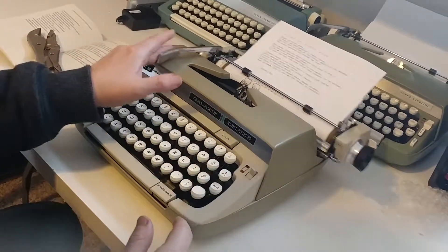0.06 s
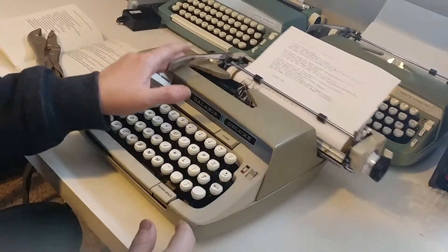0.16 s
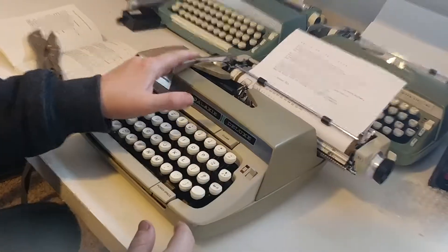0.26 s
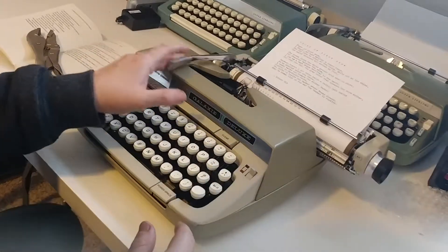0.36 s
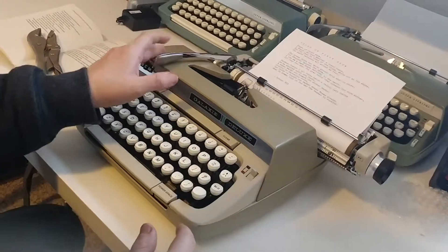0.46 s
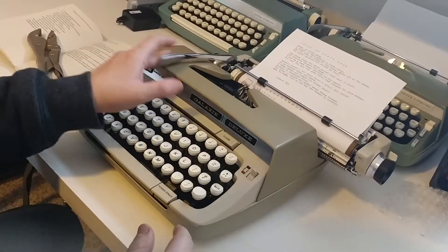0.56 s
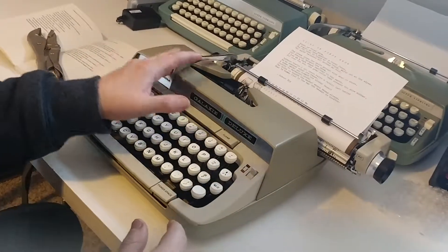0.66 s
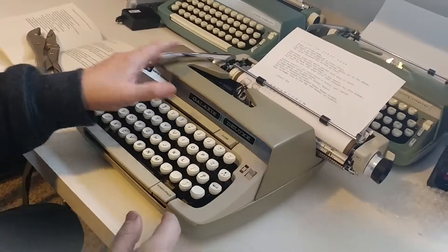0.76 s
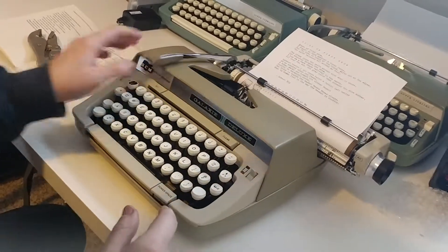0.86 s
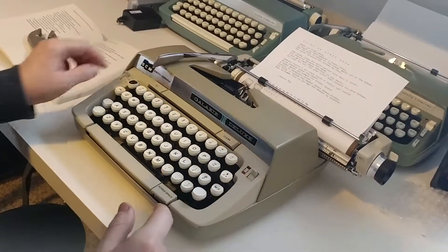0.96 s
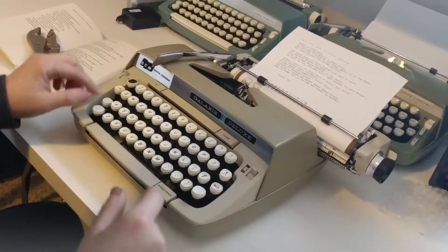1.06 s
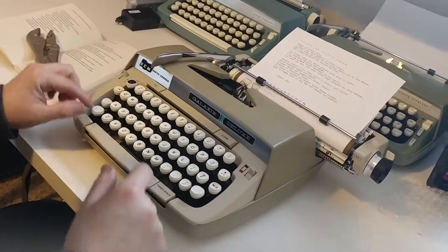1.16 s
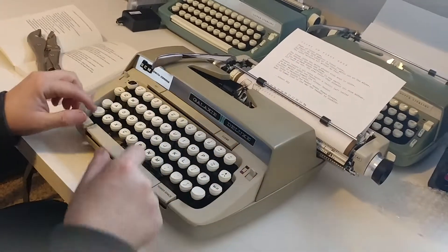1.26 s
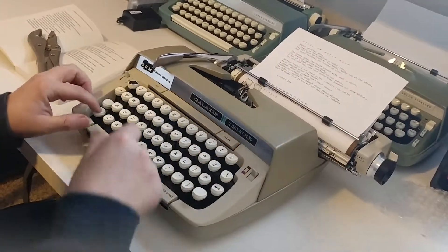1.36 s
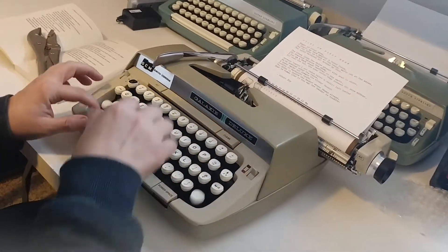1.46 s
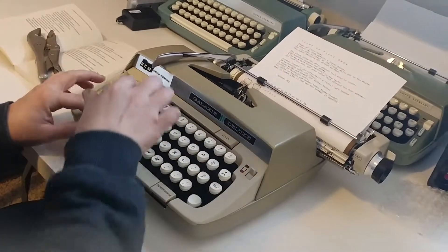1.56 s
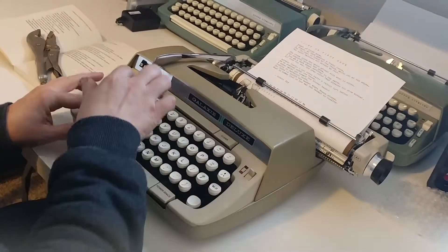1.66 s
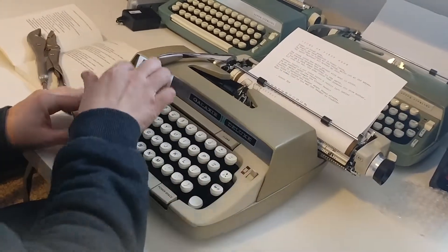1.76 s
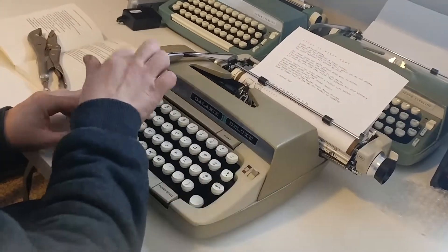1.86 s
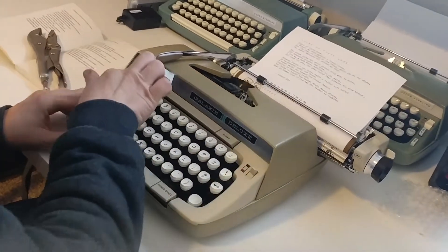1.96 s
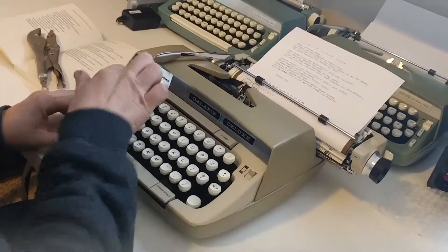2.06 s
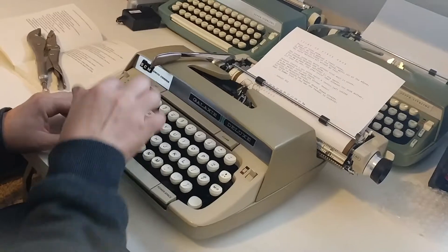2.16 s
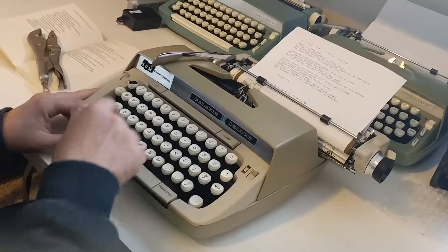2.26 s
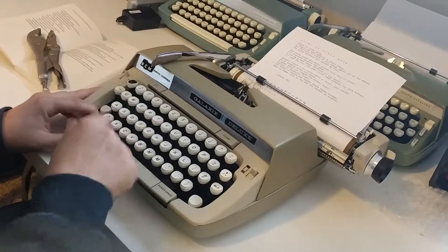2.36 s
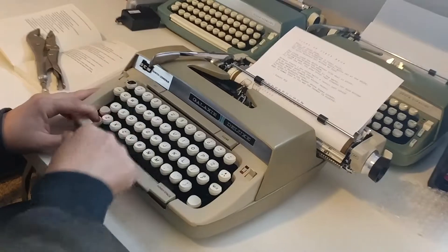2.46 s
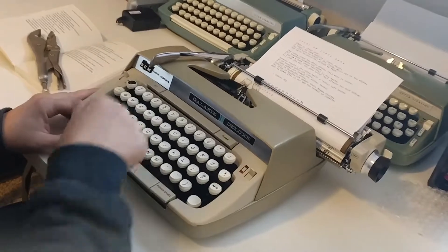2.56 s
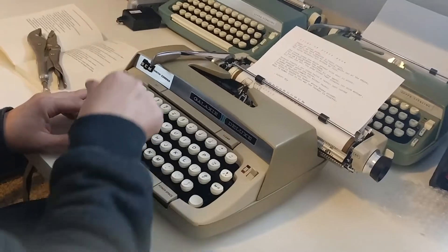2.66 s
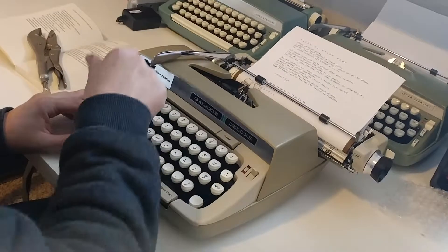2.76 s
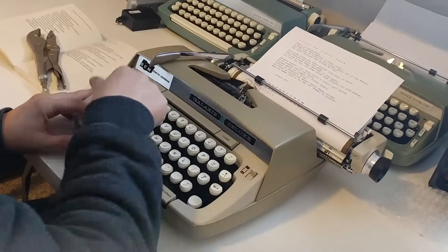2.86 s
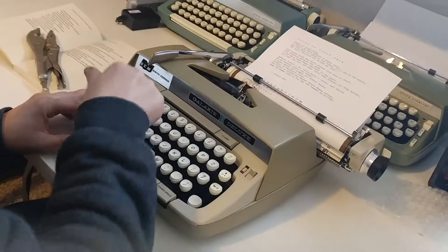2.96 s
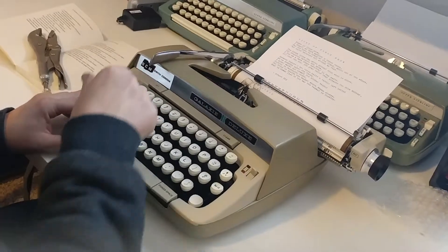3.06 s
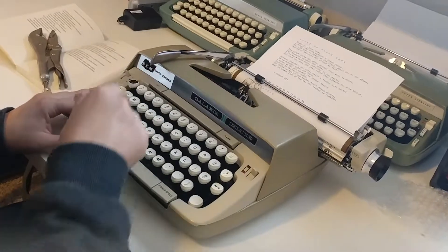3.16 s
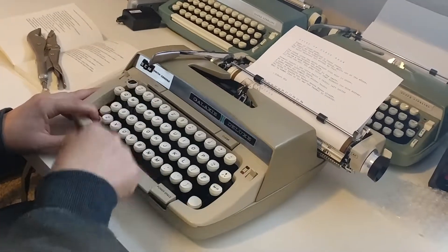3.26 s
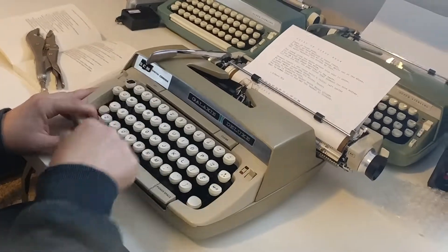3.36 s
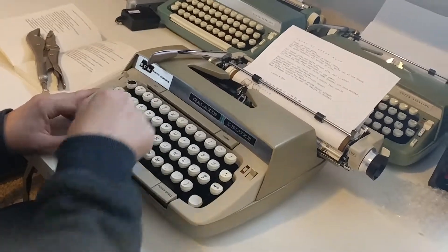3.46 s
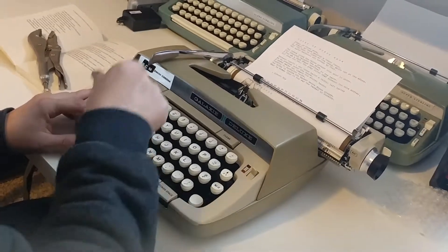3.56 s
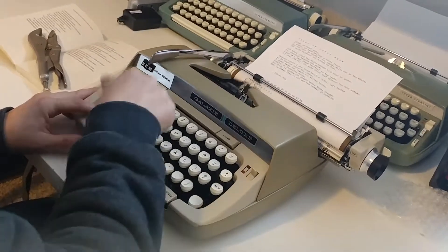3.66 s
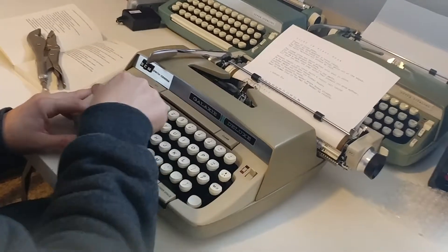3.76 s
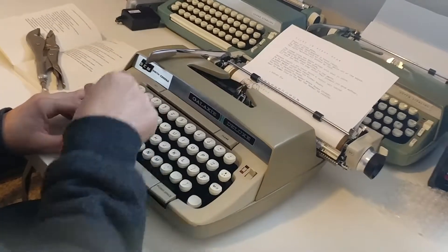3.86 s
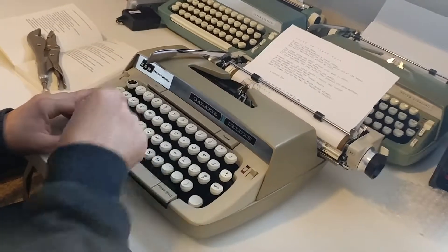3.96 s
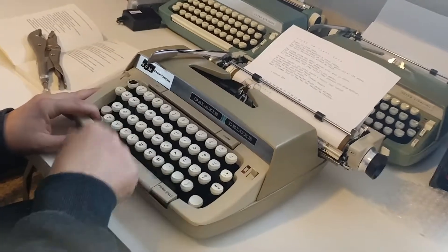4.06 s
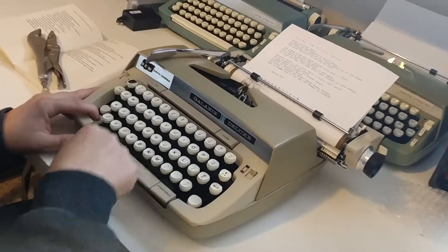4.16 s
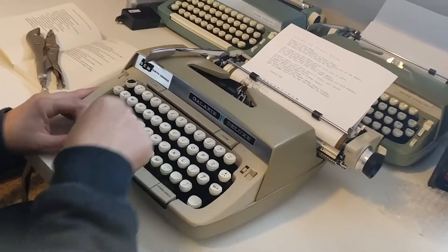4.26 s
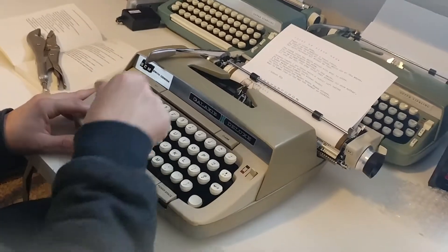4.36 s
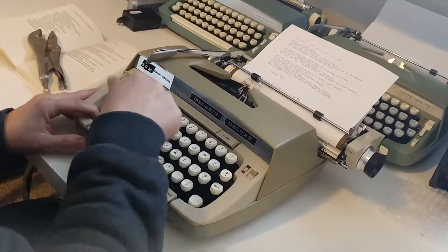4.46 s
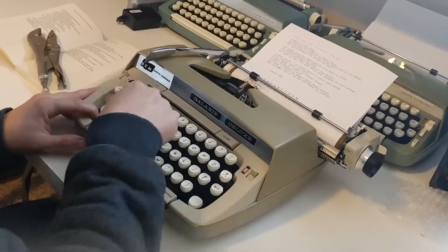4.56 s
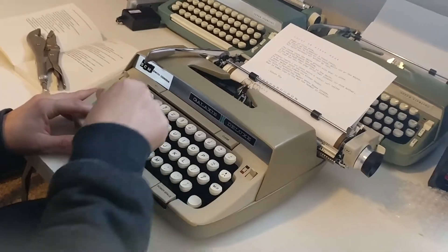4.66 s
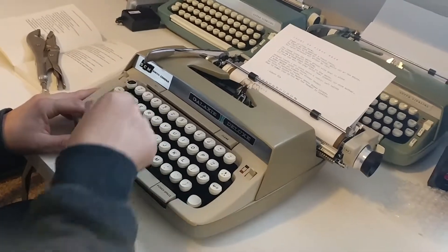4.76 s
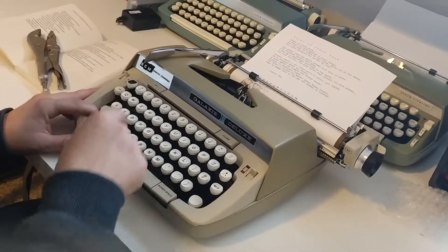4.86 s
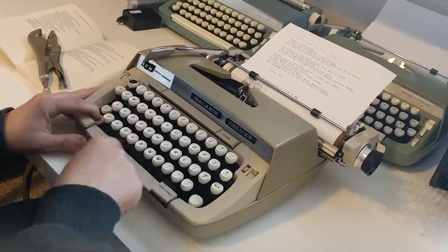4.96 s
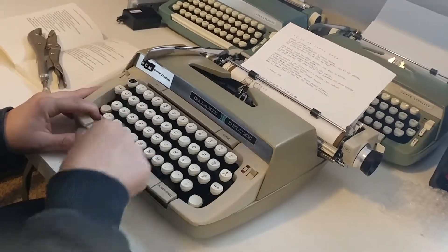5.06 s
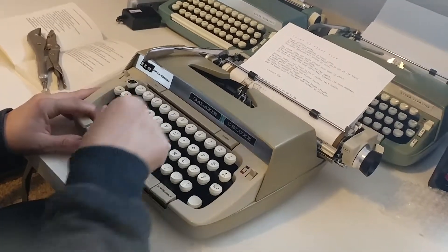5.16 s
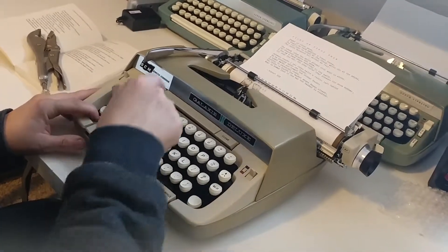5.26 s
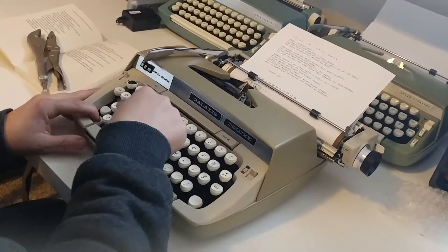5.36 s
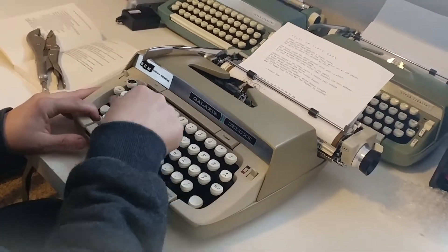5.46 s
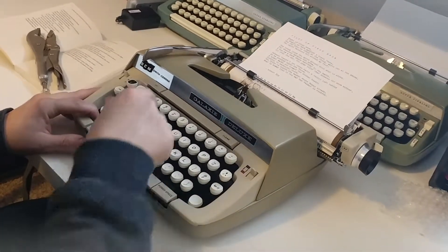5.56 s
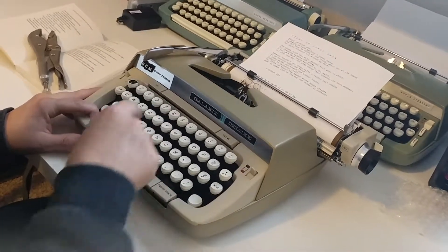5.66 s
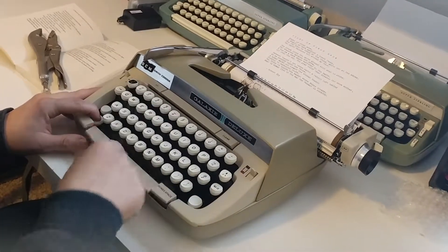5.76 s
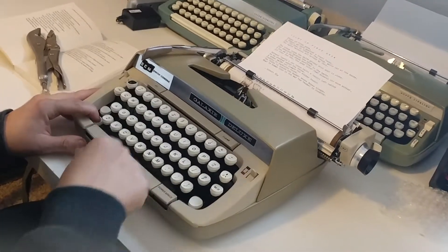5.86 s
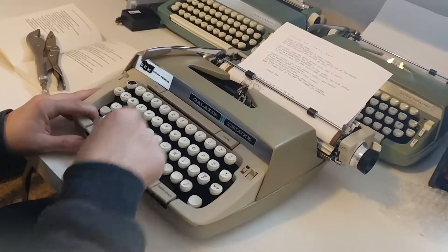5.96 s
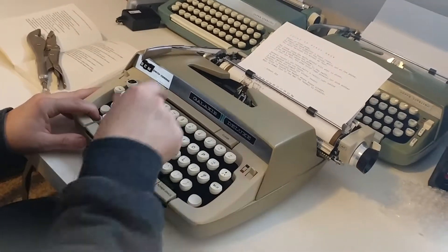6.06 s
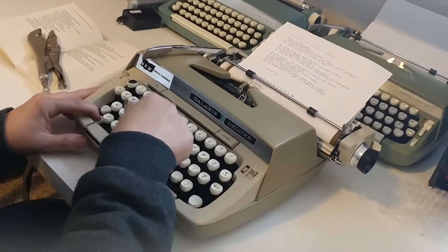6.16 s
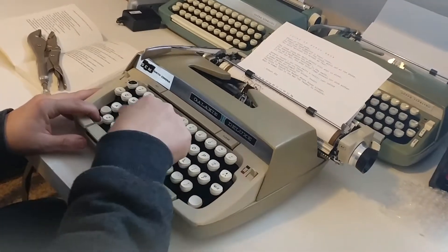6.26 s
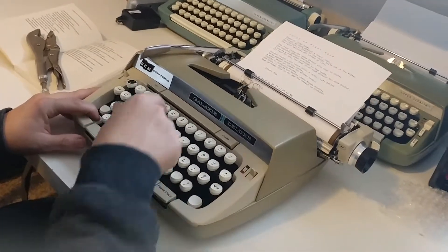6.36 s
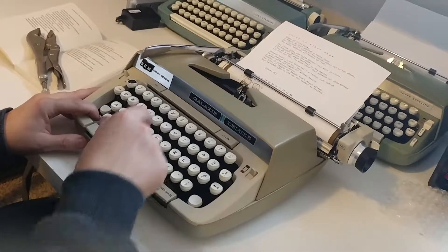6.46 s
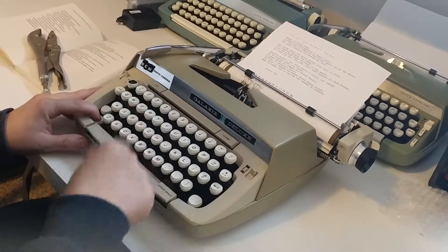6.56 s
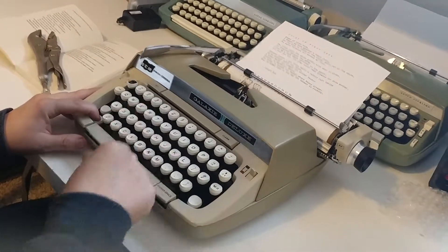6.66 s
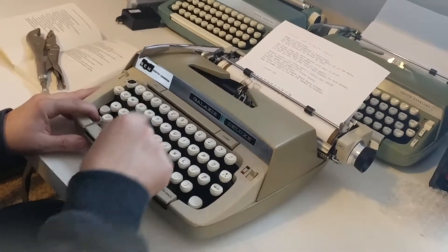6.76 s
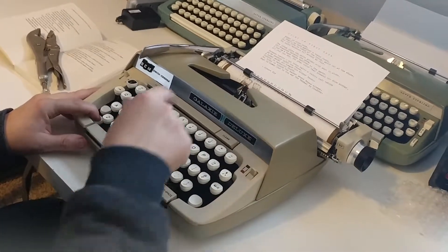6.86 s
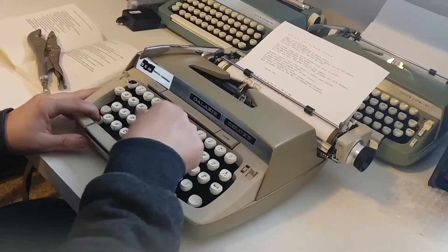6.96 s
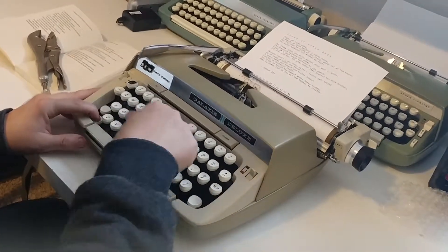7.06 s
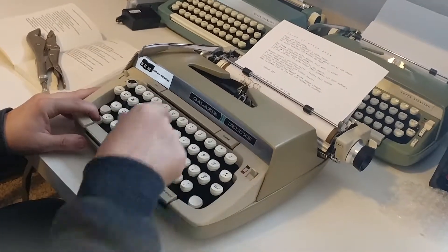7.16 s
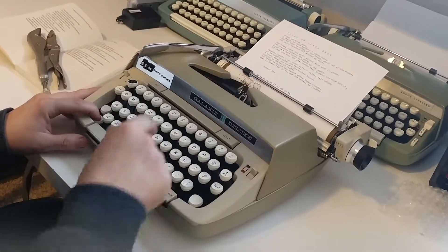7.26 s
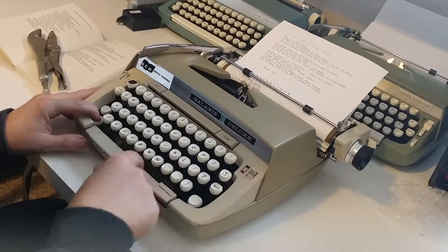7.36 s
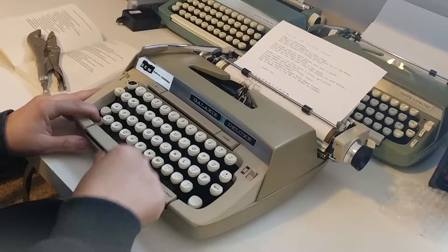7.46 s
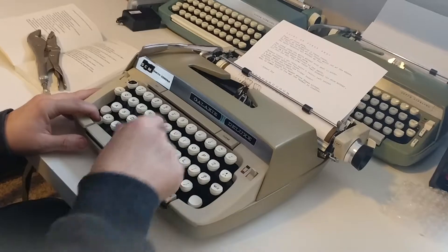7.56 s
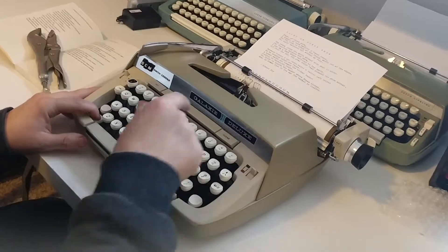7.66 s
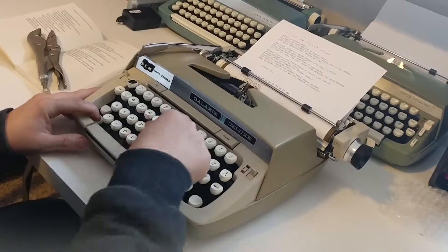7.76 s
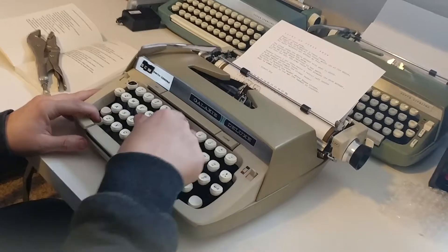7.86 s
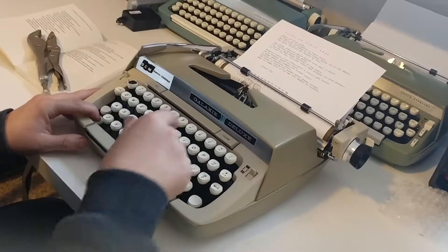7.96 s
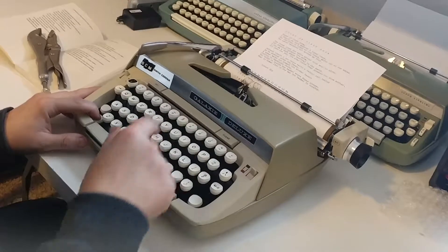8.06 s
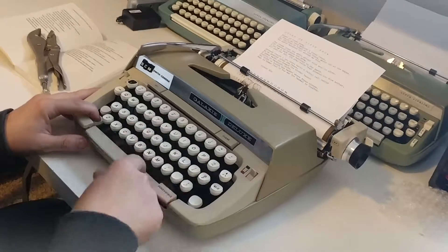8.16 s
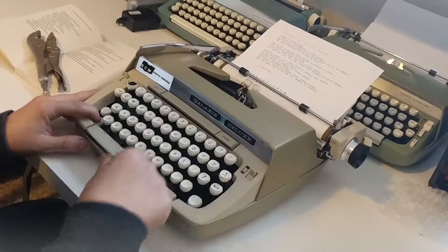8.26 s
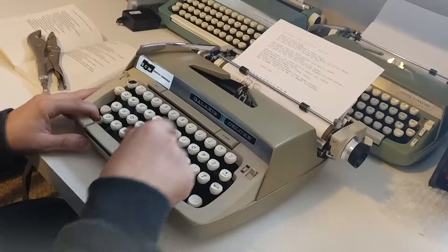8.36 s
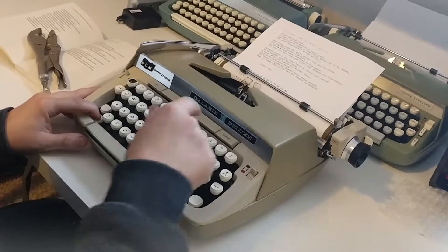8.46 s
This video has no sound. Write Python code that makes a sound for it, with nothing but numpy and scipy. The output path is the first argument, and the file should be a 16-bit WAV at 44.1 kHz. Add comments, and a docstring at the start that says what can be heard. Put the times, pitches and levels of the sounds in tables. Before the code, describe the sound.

Close stereo pickup of a portable typewriter: first a ratcheting carriage push ending in a solid stop, lever clicks and a second light knock. Fingertips brush the casing, a muffled shift thump follows, and then eight hard metallic letter snaps come at a slow regular pace, each answered by a space bar clack and its loose release rattle. Faint low room tone stays underneath.

```python
"""A portable manual typewriter on a table in a small quiet room, heard from close by.
The carriage is pushed home and nudged again, the shift key thuds down, then a letter and the space bar alternate.
Clicks and bursts of clicks set banded noise and decaying sines ringing: the steel works, the casing, the table top.
Faint coloured noise is the room tone; a limiter pulls down the loudest peaks."""
import sys
import numpy as np
from scipy import signal
from scipy.fft import rfft, irfft, next_fast_len
from scipy.io import wavfile
from scipy.ndimage import uniform_filter1d, minimum_filter1d

SR = 44100
rng = np.random.default_rng(int(sys.argv[2]) if len(sys.argv) > 2 else 0)


def transcribe(signal):
    """Save signal, clipped to [-1, 1], as a 16-bit WAV file at the path in sys.argv[1]."""
    frames = np.atleast_2d(signal).T
    limited = np.clip(frames, -1, 1)
    pcm = np.round(limited * 32767).astype(np.int16)
    wavfile.write(sys.argv[1], SR, pcm)


N = 375291
RING_TIME_S = np.arange(SR // 2) / SR

# Letter strokes. Each row: strike in seconds, level in dB, key travel before it in seconds.
LETTER_STROKES = [(2.045, -4.5, .035), (2.9784, -2.5, .030), (3.797, -1.5, .028), (4.6181, -2.5, .030),
                  (5.4824, -1.5, .029), (6.299, -1.5, 0.03), (7.097, -2.5, .032), (7.868, -4.5, .034)]
# Typebars dropping back into the basket. Each row: start in seconds, level in dB.
TYPEBAR_RETURNS = [(2.276, -52), (3.129, -26), (3.984, -29), (4.786, -27.5), (5.622, -24), (6.447, -25.5),
                   (7.258, -37.5), (8.02, -36)]
# Space bar. Each row: clack in seconds, level in dB, hold in seconds, escapement level on release in dB.
SPACE_STROKES = [(2.505, -14.5, 0.097, -23.5), (3.379, -15.5, 0.091, -27.5), (4.190, -17, 0.092, -24),
                 (5.038, -14.5, 0.085, -37.5), (5.872, -15.5, 0.083, -44), (6.690, -13, .088, -30),
                 (7.47, -13, 0.087, -46), (8.264, -13, 0.079, -62.5)]
# Return lever and carriage knocks. Each row: start in seconds, level in dB, table thump in dB.
CARRIAGE_KNOCKS = [(.030, -27.5, -22), (0.3092, -13, -18.5), (.459, -46, -50), (.691, -27.5, -25.5),
                   (0.714, -24.5, -25.5), (.865, -36, -38.5)]
# Soft fingertip taps on the casing. Each row: start in seconds, level in dB, table thump in dB.
CASING_TAPS = [(.882, -36, -38), (.945, -44, -35), (1.005, -65, -42), (1.115, -47.5, -48),
               (1.203, -73, -44.5)]
# Colours of ringing parts. Each row: frequency in Hz, relative density in dB per Hz.
LINKAGE_COLOUR = [(150, -21.5), (300, -13.5), (900, -13.5), (1400, -8.5), (2100, -13), (3000, -5),
                  (5000, -10.5), (7000, -8), (8700, 0.5), (12000, -2.5), (15000, -4.5)]
SPACE_BAR_COLOUR = [(150, -21.5), (260, -6.5), (400, -11.5), (520, -2.5), (800, -6.5), (1500, -3),
                    (2100, -5), (3000, 0.5), (4000, -5), (4900, -3.5), (7000, 2.5), (8500, -1),
                    (12000, -3.5), (15000, -11.5)]
CARRIAGE_COLOUR = [(150, -8), (300, -4), (600, -4), (1200, -5), (2000, -9), (2900, -2), (4000, -8),
                   (6000, -5.5), (7200, 0), (8500, -0.5), (12000, -2.5), (15000, -6.5)]

SHIFT_S = 1.607  # the shift key goes down
THUD_LAG_S = 0.0047


def from_db(db):
    """Decibels to an amplitude factor."""
    return 10 ** (np.asarray(db) / 20)


def rms_one(x):
    """Scale to rms 1."""
    return x / np.sqrt(np.mean(x ** 2) + 1e-20)


def at_hz(points, hz):
    """Read a table on a log-frequency axis."""
    points = np.array(points)
    return np.interp(np.log(hz + 1e-3), np.log(points[:, 0]), points[:, 1])


def panned(x, pan_db):
    """Offset the sides by pan_db, left minus right."""
    return x * from_db([[pan_db / 2], [-pan_db / 2]])


def add(track, s, part):
    """Mix a part into a track at a time."""
    at = max(round(s * SR), 0)
    track[at:at + len(part)] += part[:max(N - at, 0)]


def follows(db, law):
    """One level follows another by a law of (at this dB, gives dB, dB per dB)."""
    reference_db, gives_db, slope = law
    return gives_db + slope * (db - reference_db)


def stereo_noise(colour, size):
    """Coloured noise at rms 1, its left-right likeness set by frequency."""
    # Each row: frequency in Hz, left-right correlation.
    likeness = [(40, 0.82), (130, 0.98), (260, 0.23), (500, 0.59), (1000, .15), (3000, 0.075),
                (15000, 0.098)]
    hz = np.fft.rfftfreq(size, 1 / SR)
    mid, side = rfft(rng.standard_normal((2, size)))
    alike = np.clip(at_hz(likeness, hz), -1, 1)
    both = np.sqrt(1 + alike) * mid + np.sqrt(1 - alike) * side * [[1], [-1]]
    return rms_one(irfft(both * from_db(at_hz(colour, hz)), size))


def response(colour, ring_share, direct_db, uneven_db=1.47):
    """A part's answer to one click: a brief direct crack, then crowded modes and reflections dying band by band."""
    # Ring of machine and room together. Each row: frequency in Hz, t60 in seconds before ring_share.
    ring = [(60, 0.53), (150, 0.38), (500, 0.36), (1200, 0.27), (3000, 0.24), (6000, 0.2402), (9000, 0.22),
            (13000, .17)]
    t = RING_TIME_S
    hz = np.fft.rfftfreq(len(t), 1 / SR)
    spectrum = rfft(stereo_noise(colour, size=len(t)))

    # modes bunch unevenly
    grid_hz = np.arange(1500, 16000, 45)
    bunching = np.interp(hz, grid_hz, rng.standard_normal(len(grid_hz)), left=0)
    clusters = from_db(uneven_db * bunching)
    power = np.abs(spectrum[0]) ** 2
    spectrum = spectrum * clusters / np.sqrt(np.average(clusters ** 2, weights=power))

    centres_hz = np.array(ring)[:, 0]
    out = 0
    for own, (_, t60_s) in zip(np.eye(len(ring)), ring):
        band = irfft(spectrum * at_hz(np.c_[centres_hz, own], hz), len(t))
        out = out + band * np.exp(-np.log(1000) * t / (t60_s * ring_share))
    return out * (1 + from_db(direct_db) * np.exp(-t / 0.0021))


def modes(rows):
    """Sum decaying sines, one for each (Hz, dB, t60 s)."""
    t = RING_TIME_S
    return sum(from_db(db) * np.sin(2 * np.pi * hz * t) * np.exp(-np.log(1000) * t / t60_s)
               for hz, db, t60_s in rows)


def play(clicks, answer):
    """Every click sets the same answer ringing."""
    clicks = clicks[None].astype(np.float32)
    answer = np.atleast_2d(answer).astype(np.float32)
    return signal.oaconvolve(clicks, answer, axes=1)[:, :N]


def rattle(clicks, colour, ring_share, direct_db, count):
    """Touches land on different spots, and each spot rings the part in its own way."""
    spot = rng.integers(0, count, N)
    return sum(play(clicks * (spot == k), response(colour, ring_share, direct_db)) for k in range(count))


def clatter(rows, per_s, spread_db):
    """Loose parts touch at random within each (s, dB, length s), swelling and fading."""
    track, t = np.zeros(N), RING_TIME_S[:SR // 8]
    for s, db, length_s in rows:
        touched = rng.random(len(t)) < per_s / SR
        strength = from_db(spread_db * rng.standard_normal(len(t)))
        touches = touched * strength * rng.choice([-1, 1], len(t))
        phase = np.clip(t / max(length_s, .002), 0, 1)
        burst = touches * np.sqrt(np.sin(np.pi * phase).clip(0))
        add(track, s, from_db(db) * burst / (np.linalg.norm(burst) + 1e-6))
    return track


def blows(rows):
    """One clean click for each (s, dB)."""
    track = np.zeros(N)
    for s, db in rows:
        add(track, s, from_db([db]))
    return track


def rolling():
    """Teeth tick past at random, louder as each push gathers speed, and die away after it."""
    # Carriage pushed along its rail. Each row: start in seconds, end in seconds, level at the end in dB.
    pushes = [(0, 0.303, -60), (0.681, 0.864, -72)]
    swell_db_per_s, rest_db_per_s, teeth_per_s = 48.5, 140, 900
    t = np.arange(N) / SR
    level = 0
    for start_s, end_s, end_db in pushes:
        rise_db = -swell_db_per_s * np.maximum(end_s - t, 0)
        fall_db = -rest_db_per_s * np.clip(t - end_s, 0, 1)
        level = level + (t >= start_s) * from_db(end_db + rise_db + fall_db)
    ticks = (rng.random(N) < teeth_per_s / SR) * rng.standard_normal(N)
    return level * rms_one(ticks)


def room_tone():
    """Steady coloured noise under everything."""
    # Each row: frequency in Hz, relative density in dB per Hz.
    room_colour = [(25, 1.5), (62, 4.5), (100, -15.5), (140, -10), (250, -17), (500, -23.5), (1000, -29.5),
                   (2500, -36), (6000, -36.5), (15000, -33.5)]
    return from_db(-60.5) * stereo_noise(room_colour, size=N)


def booming(thumps):
    """Each (s, dB) thump swells every mode of the table top with a strength of its own."""
    # Each row: frequency in Hz, level in dB, t60 in seconds.
    table_modes = [(68.5, -12, 0.42), (125, -6, 0.091), (137.9, 2.5, 0.16), (164, -14, 0.072)]
    spread_db = 1.5
    s, db = np.transpose(thumps)
    chance_db = spread_db * rng.standard_normal((len(s), len(table_modes)))
    swell = 1 - np.exp(-RING_TIME_S / 0.0069)
    return sum(play(blows(zip(s, db + own_db)), modes([mode]) * swell)
               for mode, own_db in zip(table_modes, chance_db.T))


def table():
    """Each blow pushes the machine on its rubber feet, and the table top booms."""
    # Each row: frequency in Hz, relative density in dB per Hz.
    table_colour = [(25, -12.5), (45, -12.5), (68, 0.5), (92, -26), (135, 1), (165, -12.5), (200, -13.5),
                    (270, -11), (360, -22), (700, -57.5)]
    # Frame rocked by carriage against stop; shift thud. Each row: frequency in Hz, level in dB, t60 in seconds.
    frame_modes = [(61, -24, .24), (245, -32, .16)]
    shift_modes = [(145, -21, .15), (180, -28, .14), (310, -30, .17), (520, -39, .16)]
    # Thump follows the typebar's drop: at this dB, thump in dB, slope in dB per dB.
    return_thump = (-27.5, -38.5, 0.45)
    bar_db, bar_lag_s, knock_lag_s, shift_db = -18, .0064, .011, -21
    # a key thumps as the finger lands, then as it bottoms out
    finger_db, finger_lag_s, bottom_db, bottom_lag_s = -28.5, 0.0037, -25, 0.035
    roll_shake_db = -12  # relative to the chatter

    thumps = [(s + bar_lag_s, bar_db) for s, *_ in SPACE_STROKES]
    thumps += [(s + knock_lag_s, db) for s, _, db in CARRIAGE_KNOCKS]
    thumps += [(SHIFT_S + THUD_LAG_S, shift_db)]
    thumps += [(s + 0.006, follows(db, return_thump)) for s, db in TYPEBAR_RETURNS]
    thumps += [(s, db) for s, _, db in CASING_TAPS]
    thumps += [(s - travel_s + finger_lag_s, finger_db) for s, _, travel_s in LETTER_STROKES]
    thumps += [(s + bottom_lag_s, bottom_db) for s, _, _ in LETTER_STROKES]

    shaking = clatter([(s + .01, db - 10.5, .04) for s, db in thumps], per_s=850, spread_db=2.5)
    shaking = shaking + from_db(roll_shake_db) * rolling()
    frame = np.zeros(N)
    hardest_s = max(CARRIAGE_KNOCKS, key=lambda knock: knock[1])[0]
    add(frame, hardest_s + THUD_LAG_S, modes(frame_modes))
    add(frame, SHIFT_S + THUD_LAG_S, modes(shift_modes))
    shaken = rattle(shaking, table_colour, ring_share=0.9685, direct_db=-9.5, count=3)
    together = booming(thumps) + frame + shaken
    return signal.sosfilt(signal.butter(2, 38, "high", fs=SR, output="sos"), together)


def casing():
    """Taps as the hand leaves the machine; soft fingertips put no treble into them."""
    # Each row: frequency in Hz, relative density in dB per Hz.
    casing_colour = [(150, 0.5), (450, 4), (900, -4.5), (1800, -3.5), (2500, -8.5), (3500, -21),
                     (12000, -44.5)]
    clicks = blows([(s, db) for s, db, _ in CASING_TAPS])
    taps = play(clicks, response(casing_colour, ring_share=0.95, direct_db=-13.5))
    return signal.sosfilt(signal.butter(4, 2700, fs=SR, output="sos"), taps)


def carriage():
    """The pawl chatters along the rack while the carriage rolls; lever and stops knock."""
    # Line-space pawl snapping back as the lever is let go. Each row: start in seconds, level in dB.
    latches = [(.504, -24), (.866, -22)]
    # Each row: frequency in Hz, relative density in dB per Hz.
    latch_colour = [(300, -4), (1200, -16), (2500, -6), (5000, -4), (7000, 0.5), (8500, 1.5), (12000, -0.5),
                    (15000, 1)]
    # harder knocks are shorter: length at the reference level, halved every halving_db
    knock_s, reference_db, halving_db = .013, -28.5, 13
    knocks = [(s, db, knock_s * 2 ** ((reference_db - db) / halving_db)) for s, db, _ in CARRIAGE_KNOCKS]
    clicks = rolling() + clatter(knocks, per_s=3000, spread_db=0.5)
    knocking = rattle(clicks, CARRIAGE_COLOUR, ring_share=0.81, direct_db=-1.5, count=2)
    latching = play(blows(latches), response(latch_colour, ring_share=0.79, direct_db=-2.5))
    return panned(knocking + latching, pan_db=-4.0)


def shift():
    """The shift linkage stirs, then the type basket drops onto its stop."""
    lead_s, slack_db, clatter_s, knock_db = 0.015, -22.5, 0.032, -27  # slack_db relative to the knock
    stirring = (SHIFT_S - lead_s, knock_db + slack_db, clatter_s)
    landing = (SHIFT_S, knock_db, clatter_s)
    clicks = clatter([stirring, landing], per_s=3000, spread_db=3)
    return panned(rattle(clicks, CARRIAGE_COLOUR, ring_share=.85, direct_db=-1, count=2), pan_db=-3.5)


def space_bar():
    """The bar takes up slack and clacks down; on release the carriage steps and the bar rattles on its rest."""
    # Gentler release, softer rattle: at this escapement dB, rattle in dB, slope in dB per dB.
    bar_rest = (-24.5, -26, 0.35)
    slack_s, slack_db, clack_s = .005, -13, .010  # slack_db relative to the clack
    step_s, rest_lag_s, rest_s = .014, 0.0099, .024
    taking_up = [(s - slack_s, db + slack_db, slack_s + 0.0027) for s, db, _, _ in SPACE_STROKES]
    down = [(s, db, clack_s) for s, db, _, _ in SPACE_STROKES]
    step = [(s + held_s, db, step_s) for s, _, held_s, db in SPACE_STROKES]
    rest = [(s + held_s + rest_lag_s, follows(db, bar_rest), rest_s) for s, _, held_s, db in SPACE_STROKES]
    bar_clicks = clatter(taking_up + down + rest, per_s=3000, spread_db=4)
    clacks = rattle(bar_clicks, SPACE_BAR_COLOUR, ring_share=0.88, direct_db=-4.5, count=2)
    step_clicks = clatter(step, per_s=2300, spread_db=5.0)
    stepped = rattle(step_clicks, LINKAGE_COLOUR, ring_share=0.478, direct_db=-5, count=2)
    return panned(clacks + stepped, pan_db=-2.5)


def basket():
    """The typebar falls back among its neighbours, and the basket rings faintly on."""
    # Each row: frequency in Hz, relative density in dB per Hz.
    basket_colour = [(150, -17.5), (300, -5), (800, -7.5), (1250, -8.5), (1900, -11), (3000, -6),
                     (4300, -9.5), (6000, -2), (8500, 3), (15000, 1)]
    # Each row: frequency in Hz, level in dB, t60 in seconds.
    basket_modes = [(1180, -17, .06), (1325, -37, .4)]
    clatter_s, ring_lag_s = .026, 0.023
    clicks = clatter([(s, db, clatter_s) for s, db in TYPEBAR_RETURNS], per_s=620, spread_db=6)
    falling = rattle(clicks, basket_colour, ring_share=0.91, direct_db=3.0, count=2)
    ringing = play(blows([(s + ring_lag_s, db) for s, db in TYPEBAR_RETURNS]), modes(basket_modes))
    return panned(falling + ringing, pan_db=-4.0)


def linkage():
    """Levers and ribbon lift rattle as the key sinks; the escapement trips just before the strike."""
    # level in dB, clatter length in seconds
    key_slack, key_sink, key_trip = (-31.5, .01), (-22.5, .016), (-24.5, 0.0061)
    slack_lead_s, trip_lead_s = .005, .007
    slack = [(s - travel_s - slack_lead_s, *key_slack) for s, _, travel_s in LETTER_STROKES]
    sinking = [(s - travel_s, *key_sink) for s, _, travel_s in LETTER_STROKES]
    tripping = [(s - trip_lead_s, *key_trip) for s, _, _ in LETTER_STROKES]
    clicks = clatter(slack + sinking + tripping, per_s=3300, spread_db=0.5)
    return panned(rattle(clicks, LINKAGE_COLOUR, ring_share=1.5, direct_db=-0.5, count=2), pan_db=-3.5)


def typebar():
    """The same slug slaps the platen each time: a hard crack, then bar and frame ring and the parts settle."""
    # Each row: frequency in Hz, relative density in dB per Hz.
    platen_colour = [(150, -19.5), (260, -16.5), (400, -24), (520, -14.5), (800, -21.5), (2000, -19),
                     (2900, -7.5), (4400, -15.5), (5700, -1.5), (7000, 3), (8500, -1.5), (11000, -5),
                     (15000, -7)]
    # Each row: frequency in Hz, relative level in dB, t60 in seconds.
    typebar_modes = [(5655, 0, .26), (5825, 0, .22), (6044, 1, .23), (6503, -3, .24), (6737, -3, .25),
                     (7750, -2, .25), (7939, -2, .25), (8317, -1, .24), (8462, -1, .25)]
    ringing = response(platen_colour, ring_share=1.0, direct_db=-16.5) + from_db(-22.0) * modes(typebar_modes)
    crack_noise = stereo_noise(SPACE_BAR_COLOUR, size=len(RING_TIME_S))
    crack = from_db(-3.5) * crack_noise * np.exp(-RING_TIME_S / 0.0015)
    struck = play(blows([(s, db) for s, db, _ in LETTER_STROKES]), ringing + crack)
    touches = clatter([(s + .002, db - 7, .025) for s, db, _ in LETTER_STROKES], per_s=840, spread_db=3.0)
    settling = rattle(touches, platen_colour, ring_share=0.98, direct_db=1.0, count=1)
    return panned(struck + settling, pan_db=0.2)


def scene():
    """The room tone, the table and the machine on it."""
    machine = casing() + carriage() + shift() + space_bar() + basket() + linkage() + typebar()
    return room_tone() + table() + machine


def limiter(x, ceiling_db, release_db_per_s):
    """The gain drops around a peak, smoothed over 33 samples, and creeps back."""
    over_db = np.maximum(20 * np.log10(np.abs(x).max(axis=0) + 1e-9) - ceiling_db, 0)
    ramp_db = release_db_per_s * np.arange(N) / SR
    cut_db = np.maximum.accumulate(over_db + ramp_db) - ramp_db
    return x * from_db(uniform_filter1d(minimum_filter1d(-cut_db, size=33), size=33))


def record(dry):
    """Each microphone port colours its side, peaks are limited, the top is cut."""
    # Each row: frequency in Hz, gain in dB.
    left_port = [(60, -0.2), (500, -2), (4500, 4), (5800, 5), (7000, -2.5), (8000, -11.5), (9000, -8),
                 (10400, -26), (11400, -11), (13000, -5), (15500, -6.5)]
    right_port = [(60, 4.5), (500, -3), (4500, 4), (5800, 5), (7000, -2.5), (8500, 7.5), (9200, 4),
                  (10400, -11.5), (11300, -9), (13000, -5), (15500, -10)]
    size = next_fast_len(N + 4096)
    hz = np.fft.rfftfreq(size, 1 / SR)
    ports = from_db([at_hz(left_port, hz), at_hz(right_port, hz)])
    heard = irfft(rfft(dry, size) * ports, size)[:, :N]
    limited = limiter(heard, ceiling_db=1.3, release_db_per_s=303.0)
    return signal.sosfilt(signal.ellip(10, .1, 70, 15900, fs=SR, output="sos"), limited)


dry = scene()
out = record(dry)
transcribe(out)
```